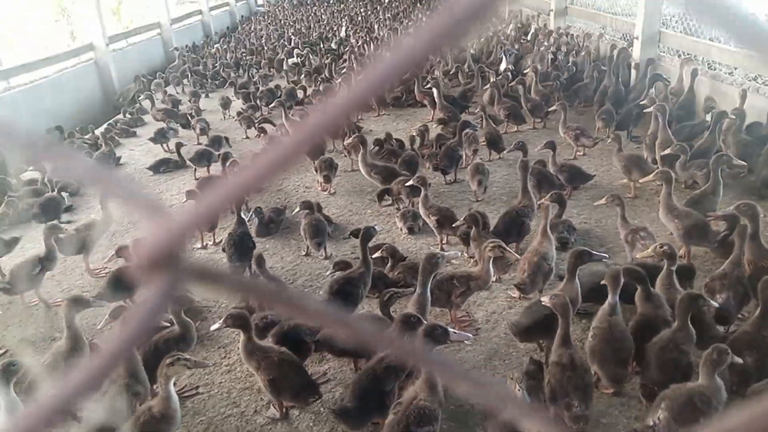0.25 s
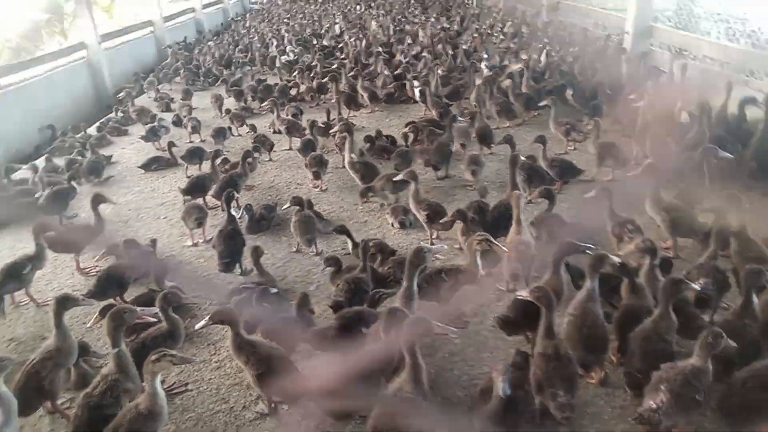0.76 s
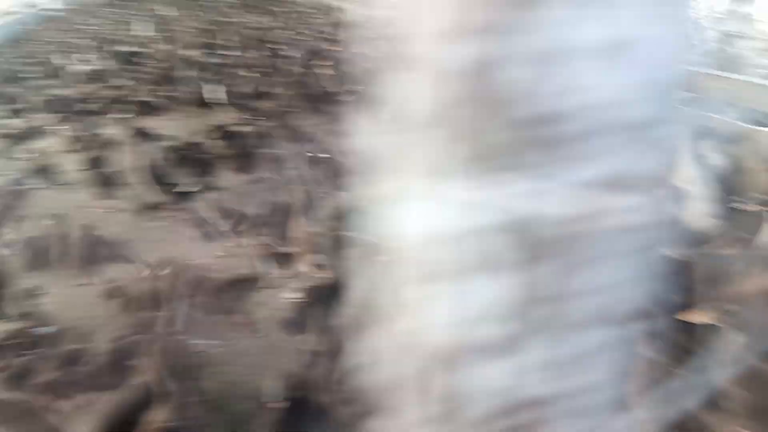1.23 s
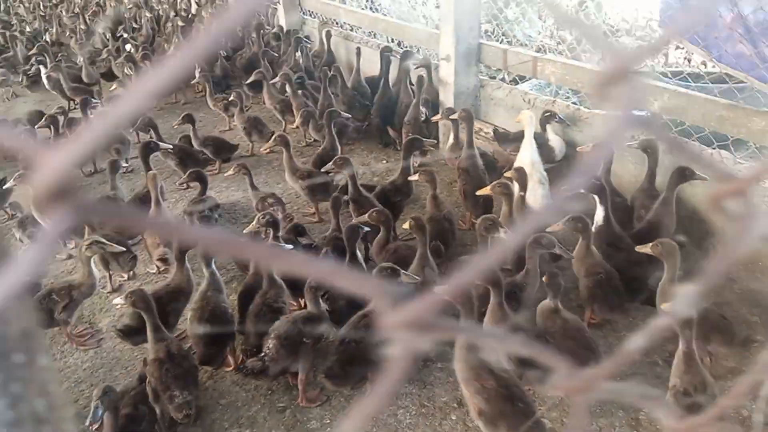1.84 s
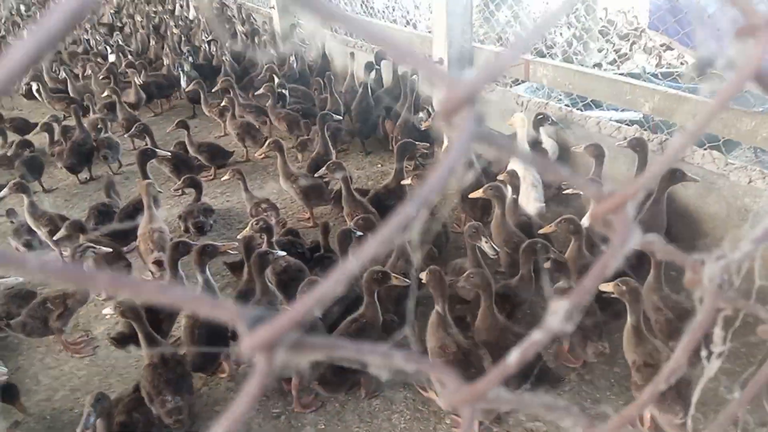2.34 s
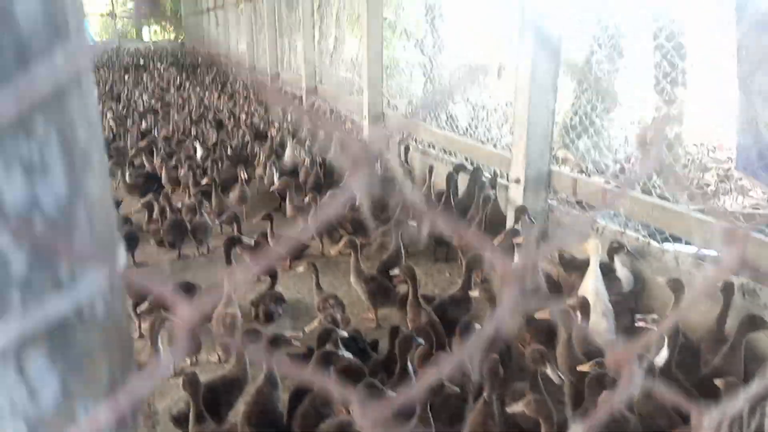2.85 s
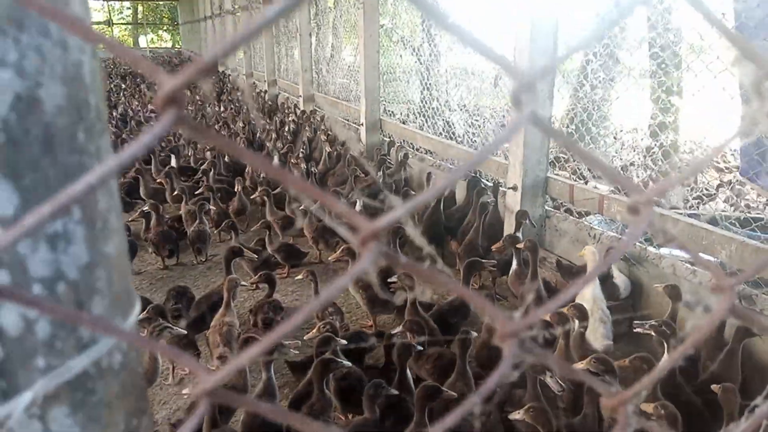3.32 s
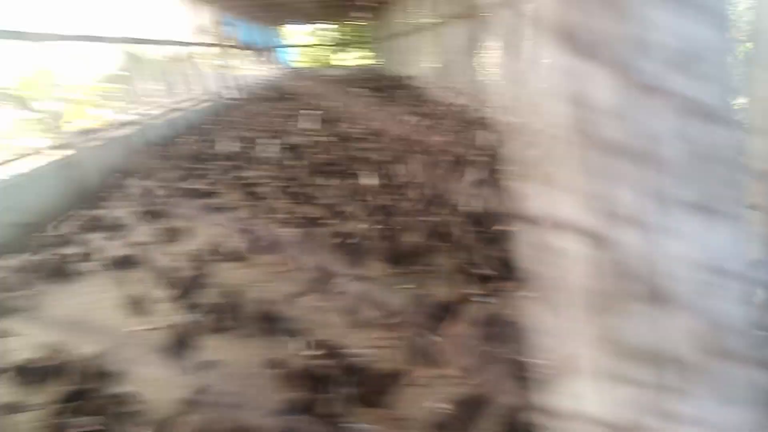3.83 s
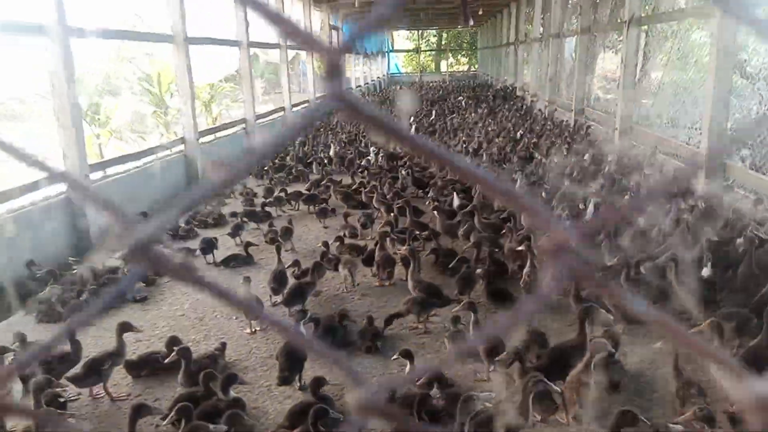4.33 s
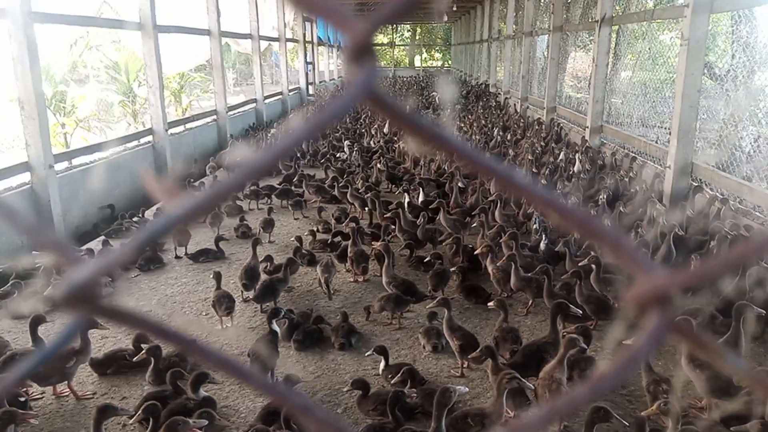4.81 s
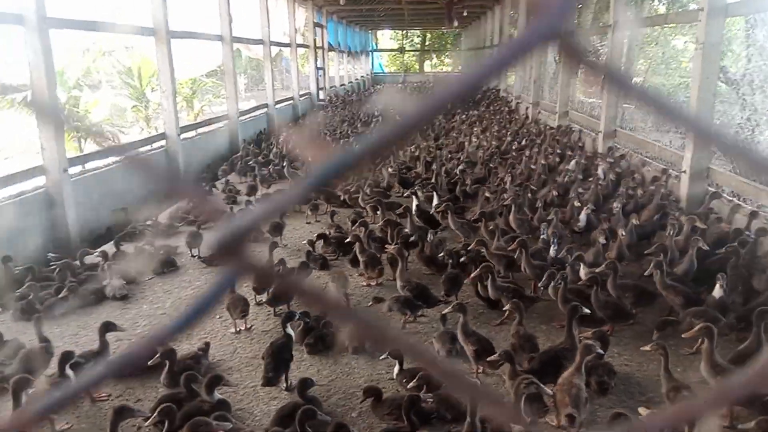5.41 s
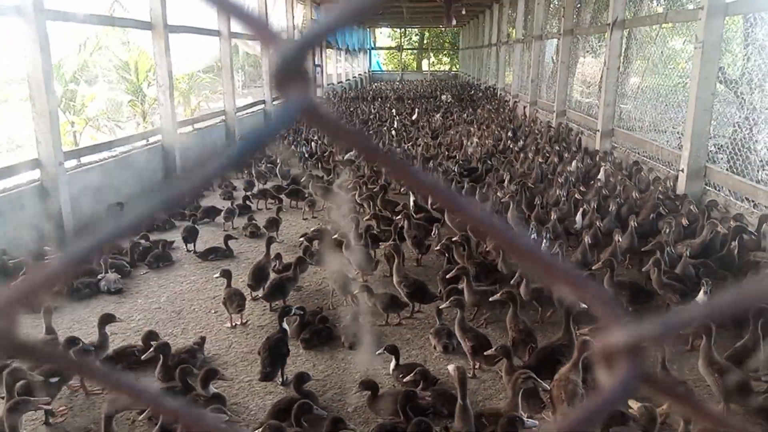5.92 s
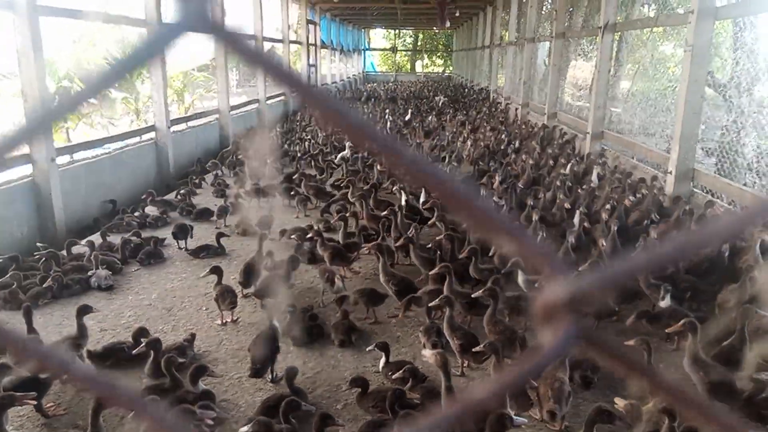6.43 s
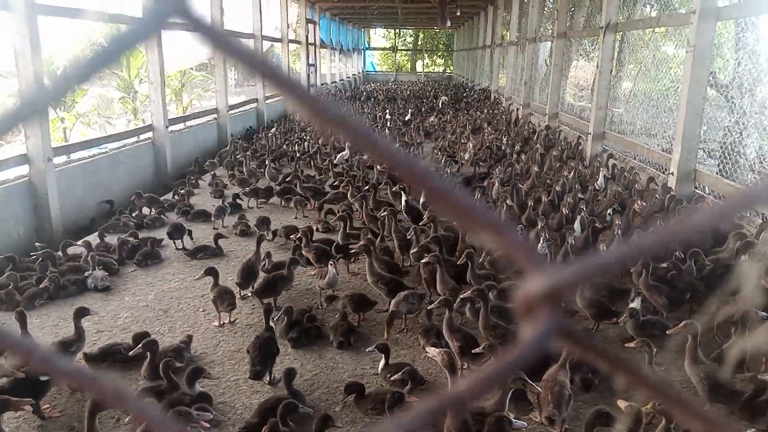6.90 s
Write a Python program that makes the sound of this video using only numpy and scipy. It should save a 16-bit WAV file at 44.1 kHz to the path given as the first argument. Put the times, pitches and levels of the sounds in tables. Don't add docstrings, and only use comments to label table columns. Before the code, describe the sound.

A brief finger brush on the phone opens onto a dense chorus of shrill duckling peeps over a fading low yard murmur. Close chirps glide up, down or arch, joined by faint low breaking whistles and a regular raspy quacking. After the busy middle the near calls thin out, smaller birds peep higher, and another duck quacks in the last second. Light gusts rumble on the microphone; hiss and short reflections remain.

```python
import sys
import numpy as np
from scipy import signal
from scipy.fft import rfft, irfft, next_fast_len
from scipy.io import wavfile
from scipy.ndimage import uniform_filter1d

SR = 44100
rng = np.random.default_rng(int(sys.argv[2]) if len(sys.argv) > 2 else 0)


def invert_db(x):
    u = np.asarray(x, float) / 20
    return 10 ** u


def materialize(psi):
    bounded = np.clip(np.atleast_2d(psi).T, -1, 1)
    quanta = np.round(bounded * 32767).astype(np.int16)
    wavfile.write(sys.argv[1], SR, quanta)


N = 315756

# (start [t/s], length [t/s], pitch [f/Hz], [level/dB])
SWEEPING_PEEPS = [(1.407, 0.085, 2645, -31.5), (2.805, 0.044, 2314, -36.5), (3.093, .034, 2426, -29),
                  (3.325, 0.03, 2316, -38), (3.575, 0.053, 2318, -35.5), (3.905, 0.045, 1802, -48.5),
                  (3.945, 0.043, 2028, -46), (3.906, 0.19, 2567, -47), (4.135, 0.021, 3017, -41),
                  (4.34, 0.16, 2527, -47), (4.445, 0.05, 2340, -43.5), (4.754, 0.043, 2303, -37.5),
                  (4.809, 0.13, 2560, -42), (5.083, 0.073, 2245, -43), (5.423, 0.082, 2296, -38),
                  (6.51, 0.12, 2320, -45)]
# (start [t/s], length [t/s], pitch [f/Hz], [level/dB])
RISING_PEEPS = [(.434, 0.079, 2248, -43), (.713, 0.066, 2263, -46), (1.746, 0.086, 2520, -52),
                (1.956, 0.053, 2627, -39.5), (2.08, 0.11, 2507, -40), (2.125, 0.045, 2743, -38.5),
                (2.39, 0.062, 2541, -36), (2.679, 0.04, 2510, -35), (2.898, 0.05, 2565, -40.5),
                (3.143, 0.045, 2756, -32.5), (3.831, 0.093, 2642, -40.5), (4.101, 0.044, 2798, -35),
                (4.222, .045, 2015, -43.5), (4.49, 0.068, 1920, -55), (5.148, 0.14, 2422, -38),
                (5.607, 0.051, 2684, -42), (6.131, 0.096, 2237, -41), (6.66, 0.12, 2390, -47),
                (.495, 0.04, 3206, -47.5), (2.84, .03, 2440, -21)]
# (start [t/s], length [t/s], pitch [f/Hz], [level/dB])
ARCHED_PEEPS = [(.005, 0.034, 2690, -41), (1.157, 0.049, 2780, -42), (1.25, 0.056, 2014, -50),
                (1.736, 0.027, 2300, -34), (2.34, 0.04, 2180, -38.5), (2.429, 0.064, 2432, -38),
                (2.479, 0.11, 2690, -39), (2.589, 0.069, 2398, -33), (2.744, 0.054, 2360, -35.5),
                (2.789, 0.073, 2563, -35.5), (3.35, 0.03, 2470, -25), (3.068, 0.072, 2190, -37.5),
                (3.223, 0.027, 2820, -35), (3.392, 0.016, 2485, -37.5), (3.607, 0.045, 2515, -30),
                (3.732, 0.058, 2495, -42.5), (5.253, 0.064, 2655, -39), (5.782, 0.054, 2243, -41),
                (5.832, 0.074, 2830, -42.5), (6.211, 0.077, 2530, -41), (6.38, 0.09, 2676, -46),
                (6.755, 0.065, 2710, -39.5)]
# (start [t/s], length [t/s], pitch [f/Hz], [level/dB])
FALLING_PEEPS = [(.18, 0.046, 2255, -38.5), (.339, .03, 2410, -44), (1.083, 0.071, 2457, -36),
                 (1.137, 0.055, 2580, -44.5), (1.502, 0.067, 2740, -45.5), (1.691, 0.042, 2770, -37.5),
                 (1.771, 0.06, 2715, -38), (2.02, 0.092, 2254, -43.5), (2.355, 0.082, 3070, -44),
                 (2.644, 0.042, 2710, -38), (2.855, .13, 2676, -32.5), (3.193, .045, 2630, -30),
                 (3.612, 0.04, 2304, -47), (4.535, .1, 2668, -44.5), (5.507, 0.066, 2509, -35),
                 (5.522, 0.075, 2632, -38), (5.852, 0.039, 2512, -29.5), (5.902, 0.058, 2370, -44.5),
                 (5.966, 0.025, 2135, -47), (7.069, 0.073, 2693, -37)]
# (start [t/s], length [t/s], pitch [f/Hz], [level/dB])
YELP = [
    (1.33, 0.065, 3267, -44.5),
]
# (start [t/s], length [t/s], pitch [f/Hz], [level/dB])
SMALL_BIRD_PEEPS = [(2.43, 0.16, 3230, -62.5), (2.7, 0.064, 3120, -53.5), (2.92, 0.089, 3130, -63),
                    (4.6, 0.052, 3140, -64), (4.8, 0.082, 3060, -51), (5.04, 0.057, 3180, -60.5),
                    (5.2, 0.11, 3030, -53), (5.55, 0.078, 2963, -48), (6.0, 0.14, 3200, -60),
                    (6.28, 0.074, 3270, -56), (6.52, 0.12, 3180, -58), (6.93, 0.13, 3180, -54.5)]
# (start [t/s], pitch [f/Hz], [level/dB])
REEDY_CALLS = [
    (1.68, 1553, -54),
    (1.92, 1488, -52.5),
    (2.161, 1536, -55.5),
    (2.395, 1564, -53),
    (2.64, 1548, -47.5),
    (2.889, 1546, -45),
    (3.136, 1556, -43),
    (3.378, 1549, -48.5),
    (3.636, 1685, -60),
]
# (multiple of pitch [1], [level/dB])
REEDY_PARTIALS = [(1, -1), (2, 0), (2.5, -10.5), (3, -7), (3.5, -11.5), (4, -14), (4.5, -20), (5, -25),
                  (5.5, -35), (6, -41.5)]
# ([f/Hz], [level/dB])
REEDY_AIR = [(3000, -29), (4200, -4), (5500, -0.5), (7200, -0.5), (8200, -17), (9500, -27.5),
             (12000, -58.5)]
# (start [t/s], pitch [f/Hz], [level/dB])
PURE_CALLS = [(1.059, 1322, -61.5), (1.337, 1464, -56), (1.482, 1426, -68.5), (1.835, 1388, -61.5),
              (2.079, 1403, -60), (2.537, 1360, -66), (2.811, 1350, -66), (3.1, 1350, -61),
              (3.549, 1330, -68.5), (3.707, 1384, -61), (4.16, 1384, -65), (4.417, 1324, -62),
              (4.522, 1470, -64), (5.02, 1282, -75.5), (5.309, 1324, -58), (5.623, 1379, -58.5),
              (5.656, 1312, -73), (2.305, 1350, -76), (3.294, 1346, -66), (3.965, 1520, -71),
              (4.23, 1515, -63.5), (3.69, 1900, -58), (2.27, 2006, -61.5), (5.7, 1700, -72),
              (7.06, 1825, -65), (1.665, 1434, -62.5)]
# (start [t/s], length [t/s], pitch [f/Hz], [level/dB])
FAR_QUACKS = [(0.005, .067, 515, -59.), (0.06, .074, 430, -62.5), (0.21, .15, 570, -58.),
              (0.73, .083, 475, -64.5), (4.020, .058, 428, -65.), (4.120, .042, 242, -72.),
              (4.870, .077, 398, -76.), (6.30, .066, 740, -64.5), (6.290, .084, 372, -71.),
              (6.820, .06, 600, -76.), (4.010, .048, 760, -75.), (1.070, .04, 400, -69.),
              (.023, .07, 830, -67.5)]
# (start [t/s], length [t/s], pitch [f/Hz], [level/dB])
MACHINE_THUDS = [
    (.36, 0.11, 128.7, -67.5),
    (.8, 0.52, 126.8, -76.5),
    (1.86, 0.101, 126.3, -61),
]
# (start [t/s], length [t/s], pitch [f/Hz], glide [%], [level/dB])
MIDDLE_PEEPS = [(0.026, 0.024, 3035, -5, -53.5), (0.041, 0.096, 2860, -1.5, -56.5),
                (0.298, 0.063, 3120, -0.5, -55), (0.402, 0.054, 2480, -3.5, -54.5),
                (0.423, 0.056, 3454, 0, -63.5), (0.451, 0.072, 2789, -0.4, -49),
                (0.66, 0.06, 2385, 4.5, -48.5), (0.74, 0.047, 2565, 0, -50),
                (0.877, 0.087, 2635, -2.5, -49), (1.461, 0.038, 1892, 4, -52),
                (1.642, 0.092, 1933, 9.9, -52), (1.654, 0.056, 3550, -0.4, -54),
                (1.802, 0.041, 2827, 4.5, -44.5), (1.904, 0.078, 2750, -5.5, -44),
                (1.905, 0.045, 3419, 5.0, -51.5), (1.922, 0.063, 3240, 5, -55.1),
                (2.16, 0.085, 2648, -3.5, -51.5), (2.351, 0.053, 3560, -2.3, -57),
                (2.633, 0.023, 1927, 6.5, -42), (2.992, 0.092, 2450, 0.1, -43),
                (3.245, 0.094, 2535, 14.5, -42.5), (3.466, 0.084, 2312, -3.5, -45.5),
                (3.49, 0.073, 2694, 0.2, -46), (3.642, 0.039, 3374, 1, -57.0), (3.666, 0.06, 3149, 0, -64),
                (4.117, 0.056, 2260, -1.0, -47.5), (4.159, 0.13, 2686, 4.5, -50.5),
                (4.695, 0.155, 2762, 13.5, -54), (5.151, 0.037, 2629, -3, -48),
                (5.248, 0.063, 2233, 0.5, -50.5), (5.706, 0.07, 2665, -5.6, -53),
                (5.939, 0.1, 2583, 9.5, -53.5), (6.179, 0.056, 3280, -2, -53.4),
                (6.198, 0.035, 3446, 0.5, -60), (6.394, 0.058, 2203, 0.7, -49),
                (6.672, 0.044, 3580, 1.2, -51), (6.679, 0.038, 3195, 4.5, -46.5),
                (6.946, 0.041, 1843, 2.5, -47.5)]
# (middle [t/s], pitch [f/Hz], voice [level/dB], rasp [level/dB])
QUACKS = [(1.272, 401.6, -67, -70.5), (1.48, 455.3, -68, -56), (1.677, 457, -70.5, -61),
          (1.922, 457, -65.5, -59.5), (2.158, 454.3, -69, -57.5), (2.393, 456, -73, -56.5),
          (2.651, 460, -67, -53.5), (2.886, 457, -66.5, -54.5), (3.135, 452, -68.5, -52.5),
          (3.369, 457, -64, -55.5), (3.641, 563, -86, -65), (3.938, 455, -66.5, -62),
          (5.983, 410.4, -62, -49.5), (6.207, 413.7, -60, -51.5), (6.423, 445.7, -53, -48.5),
          (6.694, 444, -55, -54.5), (6.973, 454.6, -60, -52)]
# ([f/Hz], [level/dB])
THROATS = [
    [(250, -34), (440, 3.5), (880, 7), (1350, -14), (1900, 18.5), (2400, 20), (3100, 13.5), (3700, 15),
     (4200, -13.5), (5000, -42)],
    [(250, 0.5), (440, -1.5), (880, 1), (1350, 3), (1800, 10), (2600, 0.5), (3100, 5.5), (3800, 0),
     (4300, -5), (5000, -41)],
]
# ([f/Hz], [level/dB])
BILLS = [
    [(3500, -19.5), (4500, -15), (5200, -8.5), (6300, 1), (7500, -15), (8200, -27), (9000, -28.5),
     (10300, -35), (12500, -62)],
    [(3500, -15), (4500, -15.5), (5600, 6.5), (6600, -2), (7900, -14.5), (8600, -20.5), (9200, -30.5),
     (11200, -22.5), (12000, -30), (12600, -65)],
]
# (start [t/s], length [t/s], [level/dB])
FACING_CALLS = [
    (2.452, 0.14, -63),
    (2.77, 0.14, -59),
    (3.062, 0.084, -66),
    (3.418, 0.14, -64),
    (3.77, 0.16, -67),
    (4.122, 0.14, -65.5),
    (4.469, 0.13, -66.5),
    (4.808, 0.18, -66),
    (5.177, 0.17, -69),
]
# (start [t/s], length [t/s], pitch [f/Hz], [level/dB])
LEVEL_OVERTONES = [(.18, 0.025, 4510, -63.5), (.215, 0.092, 4960, -66.5), (.339, 0.03, 4940, -54.5),
                   (.424, 0.027, 5760, -60), (.44, 0.074, 6730, -67.5), (1.352, 0.029, 6550, -64),
                   (2.13, 0.038, 5600, -65), (2.225, 0.035, 5240, -65), (3.158, 0.043, 5670, -54),
                   (3.602, 0.025, 7530, -64), (3.637, 0.022, 4520, -65), (3.756, .035, 7670, -73),
                   (4.085, 0.045, 5580, -57.5), (4.904, 0.03, 6800, -72.5), (5.418, 0.024, 5520, -64.5),
                   (5.52, 0.12, 5110, -70.5), (5.907, 0.082, 4660, -63), (6.575, 0.14, 6530, -66.5),
                   (7.059, 0.064, 5490, -72)]
# (start [t/s], length [t/s], pitch [f/Hz], [level/dB])
RISING_OVERTONES = [(0.25, 0.05, 5250, -67.5), (.315, .07, 5800, -65), (0.098, .03, 6670, -68.5),
                    (2.5, .03, 6700, -72), (2.5, 0.024, 4300, -76), (3.3, 0.025, 7400, -69),
                    (4.068, 0.02, 5600, -64.5), (3.7, .03, 7000, -70.5), (5.5, 0.047, 7600, -78),
                    (3.625, .04, 5700, -62), (2, .06, 3200, -74), (1.2, .07, 5450, -67.5),
                    (0.59, 0.064, 5800, -76), (5.0, .07, 4100, -78.5), (2.7, 0.045, 7700, -67),
                    (2.5, 0.13, 2800, -65), (2.49, 0.064, 8000, -79), (2.76, .09, 5100, -74),
                    (3.07, .04, 7500, -79), (2.585, 0.028, 4000, -66), (2.8, 0.021, 5600, -68),
                    (3.3, .03, 5200, -75)]
# (start [t/s], length [t/s], pitch [f/Hz], [level/dB])
FAINT_OVERTONES = [(0, 0.099, 5760, -70.5), (.0, 0.047, 5250, -72.5), (.1, 0.066, 5670, -73.5),
                   (.55, 0.033, 6840, -78.5), (.57, 0.055, 5090, -71.5), (.55, .08, 4250, -74),
                   (.64, .07, 4920, -77), (1.62, 0.029, 4600, -73), (1.99, 0.096, 5250, -71.5),
                   (2.03, 0.035, 6320, -72), (3.5, 0.066, 6860, -78), (3.615, 0.021, 5150, -63),
                   (3.65, 0.044, 6630, -64), (3.79, 0.02, 3790, -65), (4.54, 0.081, 6800, -77),
                   (4.64, 0.029, 6450, -80.5), (4.65, .04, 5550, -75), (4.56, 0.037, 5590, -56.5),
                   (4.81, 0.064, 4840, -70.5), (4.85, .06, 6330, -77.5), (5.02, 0.076, 5470, -74),
                   (5.13, 0.063, 4700, -83), (5.32, 0.04, 4070, -75.5), (6.3, .04, 4700, -77),
                   (6.51, 0.036, 5630, -67.5), (6.75, 0.071, 5480, -79), (2.365, 0.037, 4560, -67),
                   (2.42, 0.037, 5420, -70), (2.76, 0.082, 4120, -76.5), (3.31, 0.046, 5460, -71),
                   (3.755, 0.07, 5130, -63.5)]
# ([t/s], [level/dB])
CROWD_LEVEL = [(0.0, -41.5), (.78, -42.5), (1.47, -43), (1.75, -39), (1.89, -40.5), (2.27, -41),
               (2.69, -42.5), (3.15, -39.5), (4.17, -44.5), (5.84, -42), (6.18, -43.5), (7.16, -41)]
# ([f/Hz], [level/dB])
BREEZE_SPECTRUM = [(18, -38), (38, -9), (55, 3), (90, 1), (130, -10), (200, -21), (600, -82)]
# (middle [t/s], half length [t/s], [level/dB])
GUSTS = [
    (0.349, 0.3, -88),
    (1.299, 0.094, -80),
    (1.91, 0.082, -70),
    (2.719, .26, -64),
    (3.185, 0.34, -76),
    (5.56, 0.043, -71.5),
    (6.256, 0.091, -76),
]
# ([f/Hz], [level/dB])
YARD_SPECTRUM = [(60, -14), (150, 0.5), (330, -2.5), (480, -0.5), (700, -9.5), (1100, -9), (1700, -1),
                 (3500, -0.5), (4200, -9.5), (5600, -7), (7000, -14.5), (8300, -29.5), (12000, -46.5)]
# ([f/Hz], [level/dB])
MIC_HISS = [(7000, -29), (9000, -9), (13800, -14.5), (14800, -1.5), (15700, -1.5)]


def near_birds():
    peeps = whistle(
        glide(SWEEPING_PEEPS, (-6, 7)) + glide(RISING_PEEPS + SMALL_BIRD_PEEPS, (-2.2, 2.87))
        + glide(ARCHED_PEEPS, (-1.8, -1.8)) + glide(FALLING_PEEPS, (2.2, -2.8)) + glide(YELP, (-17.5, -14.5)),
        [(1, 0)], waver=.013, flutter_db=1.5, throb_db=3.2)
    call_s = .04
    reedy_notes = glide([(s, call_s, hz, db) for s, hz, db in REEDY_CALLS], (1.2, 0.14))
    reedy = whistle(reedy_notes, REEDY_PARTIALS, waver=.011, flutter_db=4.5, throb_db=1.5)
    reedy = reedy + reedy_rasp(call_s)
    pure_notes = glide([(s, call_s, hz, db) for s, hz, db in PURE_CALLS], (2.8, -1.7))
    pure = whistle(pure_notes, [(1, 4.5), (3, -28.5)], waver=0.02, flutter_db=3.5)
    far_notes = glide(FAR_QUACKS + MACHINE_THUDS, (1.6, -2.2))
    far = whistle(far_notes, [(1, 1.0), (2, -22.5)], waver=0.032, flutter_db=3.0)
    return peeps + shed(reedy + pure, -12.5) + far


def whistle(notes, partials, edge=.35, shape=0.9, waver=0.0054, flutter_db=5.0, throb_db=2.0):
    out = np.zeros(N + SR)
    wobble, flutter, throb = walk(90), walk(70), walk(260)
    for (start, length, hz0, hz1, hz2, db), turn in zip(notes, rng.random(len(notes))):
        first = max(int((start - edge * length / 2) * SR), 0)
        at = np.arange(first, min(first + int((1 + edge) * length * SR), N))
        z = np.clip((at / SR - start) / length, 0, 1)
        hz = hz0 * (1 - z) * (1 - 2 * z) + 4 * hz1 * z * (1 - z) + hz2 * z * (2 * z - 1)
        moved = at - first + int(turn * (N - len(at)))
        phase = 2 * np.pi * (np.cumsum(hz * (1 + waver * wobble[moved])) / SR + turn)
        unsteady_db = flutter_db * flutter[moved] + throb_db * (1 - throb[moved] ** 2)
        swell = np.sin(np.pi * (at - first) / len(at)) ** shape * invert_db(db + unsteady_db)
        tone = sum(invert_db(partial_db) * np.sin(k * phase) for k, partial_db in partials)
        out[at] += np.sqrt(2) * swell * tone
    return out[:N]


def glide(rows, pct):
    start, end = 1 + pct[0] / 100, 1 + pct[1] / 100
    return [(s, length, hz * start, hz, hz * end, db) for s, length, hz, db in rows]


def reedy_rasp(call_s):
    t = np.arange(N) / SR
    lag_s = 0.042
    puffs = sum(invert_db(db) * np.exp(-abs((t - s - lag_s) / (0.42 * call_s)) ** 3) for s, hz, db in REEDY_CALLS)
    air = level(colour(rng.standard_normal(N), REEDY_AIR), -11)
    return air * puffs * invert_db(3. * walk(300))


def quacks():
    out, wobble = np.zeros(N), walk(200)
    second_bird_s = 5
    length_s, lag_s = (0.05, .07), (0.0052, -0.0014)
    jitter, arch, rise, hoarse, scoop = (.025, .018), (.05, .015), (.13, -.01), (.55, .42), (0, .12)
    voice_span, rasp_span, rasp_edge = 0.45, (.62, .45), (2.6, 3.)
    breath, opening, rasp_db = 0.42, 0.69, 3
    for middle, pitch_hz, low_db, high_db in QUACKS:
        bird = int(middle > second_bird_s)
        length = length_s[bird]
        at = np.arange(int((middle - 1.2 * length) * SR), min(int((middle + 1.2 * length) * SR), N))
        z = (at / SR - middle) / length
        onset = scoop[bird] / (1 + np.exp((z + .42) / .08))
        hz = pitch_hz * (1 - arch[bird] * (2 * z) ** 2 + rise[bird] * z - onset + jitter[bird] * wobble[at])
        throat_hz, throat_db = np.transpose(THROATS[bird])
        throat_db = throat_db + (throat_hz > 1600) * opening * (high_db - low_db - 3.5)
        voice = stack(hz, throat_hz, throat_db, flicker_db=4.5, patchy_db=2.4, count=11, blur=.35)
        air_points = np.transpose([throat_hz, throat_db - 6 * (throat_hz < 1600)])
        air = level(colour(rng.standard_normal(len(at)), air_points))
        voice = voice + hoarse[bird] * np.std(voice) * air
        bill_hz, bill_db = np.transpose(BILLS[bird])
        rasp = level(stack(hz, bill_hz, bill_db, flicker_db=6.5, patchy_db=4.5, count=31, blur=.4))
        pulse = 1 + 0.32 * np.cos(2 * np.pi * np.cumsum(hz) / SR)
        rasp = rasp + breath * level(colour(rng.standard_normal(len(at)), BILLS[bird])) * pulse
        rasp_z = (z - lag_s[bird] / length) / rasp_span[bird]
        out[at] += voice * invert_db(low_db) * np.exp(-abs(z / voice_span) ** 2)
        out[at] += rasp * invert_db(high_db + rasp_db) * np.exp(-abs(rasp_z) ** rasp_edge[bird])
    return out


def stack(hz, at_hz, db, flicker_db, patchy_db, count, blur):
    k = np.arange(1, count + 1)[:, None]
    hold = 300
    steps = rng.standard_normal((count, len(hz) // hold + 1))
    flicker = uniform_filter1d(np.repeat(steps, hold, axis=1), hold, axis=1)[:, :len(hz)]
    own_db = patchy_db * rng.standard_normal((count, 1))
    gain = invert_db(np.interp(np.log(k * hz), np.log(at_hz), db) + flicker_db * flicker + own_db)
    cycles = k * np.cumsum(hz) / SR + blur * rng.random((count, 1))
    return np.sum(gain * np.cos(2 * np.pi * cycles), axis=0)


def overtones():
    caller_hz = 5250
    notes = (glide([(s, length, caller_hz, db) for s, length, db in FACING_CALLS], (-7.5, 3.5))
             + glide(LEVEL_OVERTONES, (0, 0)) + glide(RISING_OVERTONES, (-3, 2.7))
             + glide(FAINT_OVERTONES, (.8, -1.2)))
    return shed(whistle(notes, [(1, 0), (2, -39)], waver=.012, flutter_db=2.5, throb_db=3.5), -5)


def middle_birds():
    notes = [(s, length, hz * (1 - pct / 200), hz, hz * (1 + pct / 200), db)
             for s, length, hz, pct, db in MIDDLE_PEEPS]
    return shed(whistle(notes, [(1, 2.0)], waver=.008, flutter_db=1.5, throb_db=4.0), -12.5)


def crowd(count=1250, facing=300):
    when, rise, arch, span, loud = rng.random((count, 5)).T
    bell = rng.standard_normal(count)
    hz = 2468 * np.exp(.09 * bell)
    rise = 0.06044 * (2 * rise - .7)
    db = -np.log(1 - .95 * loud) - 1.31 * bell ** 2
    length_s = .05 * (.55 + span)
    notes = np.transpose([when * N / SR, length_s, hz * (1 - rise), hz * (1 + 0.0383 * arch),
                          hz * (1 + rise), db])
    peeps = whistle(notes, [(1, 0)], waver=0.008, flutter_db=4.0, throb_db=3.3)
    octaves = whistle(notes[:facing], [(2, -2.5), (3, -19.5)], waver=0.0074, flutter_db=5.5)
    return level(peeps) + level(octaves, -31)


def shed(x, wet_db):
    t60_s, gap_s = 0.21, 0.0074
    t = np.arange(SR // 2) / SR
    tail = rng.standard_normal(len(t)) * 1000. ** (-t / t60_s) * (t > gap_s)
    tail = colour(tail, [(300, 1.5), (3000, 0.0), (8000, -8.5)])
    return x + signal.fftconvolve(x, tail * invert_db(wet_db) / np.sqrt(np.sum(tail ** 2)))[:N]


def first_tick(t):
    burst = level(colour(rng.standard_normal(N), [(300, 2), (6000, -7.5), (9000, -35.5)]))
    return invert_db(-50) * np.exp(-t / 0.01) * burst


def breeze(t):
    calm_db = -81
    gusts = invert_db(calm_db) + sum(invert_db(db) * np.exp(-((t - s) / half) ** 2) for s, half, db in GUSTS)
    return level(colour(rng.standard_normal(N), BREEZE_SPECTRUM)) * gusts * invert_db(3.2 * walk(8.2))


def yard(t):
    split_hz, hiss_db = 1150, -66
    start_db, fade_db_s, rest_db = -54, 6, -66
    noise = level(colour(rng.standard_normal(N), YARD_SPECTRUM))
    low = signal.sosfilt(signal.butter(2, split_hz, fs=SR, output="sos"), noise)
    murmur = np.hypot(invert_db(start_db - fade_db_s * t), invert_db(rest_db))
    return invert_db(1.1 * walk(8)) * (low * murmur + (noise - low) * invert_db(hiss_db))


def duck(x):
    depth_db, from_db = 6, -39
    share = uniform_filter1d(x ** 2, SR // 8) / invert_db(2 * from_db)
    return -depth_db * share / (1 + share)


def level(x, db=0):
    return x * invert_db(db) / np.sqrt(np.mean(x ** 2))


def colour(x, points):
    hz, db = np.transpose(points)
    size = next_fast_len(len(x))
    f = np.maximum(np.arange(size // 2 + 1) * SR / size, 1)
    gain = invert_db(np.interp(np.log(f), np.log(hz), db))
    return irfft(rfft(x, size) * gain, size)[:len(x)]


def walk(rate):
    k = int(SR / rate)
    held = np.repeat(rng.standard_normal(N // k + 1), k)
    return 1.363 * uniform_filter1d(uniform_filter1d(held, k), k)[:N]


def scene():
    t = np.arange(N) / SR
    birds = shed(near_birds(), -12.5) + shed(quacks(), -14.0) + overtones()
    crowd_db = np.interp(t, *np.transpose(CROWD_LEVEL)) - 2.5 + 1.8 * walk(10)
    birds = birds + level(shed(crowd(), -6)) * invert_db(crowd_db)
    background = breeze(t) + yard(t) * invert_db(duck(birds) + 0.05) + first_tick(t)
    return (birds + background + middle_birds())[None]


def roll_off(x):
    return signal.sosfilt(signal.butter(12, 15720, fs=SR, output="sos"), x)


def record(dry):
    hiss = level(colour(rng.standard_normal(N), MIC_HISS), -83)
    hiss = hiss * invert_db(1.2 * walk(7.5) + duck(dry[0]))
    return roll_off(dry + hiss)


dry = scene()
out = record(dry)
materialize(out)
```